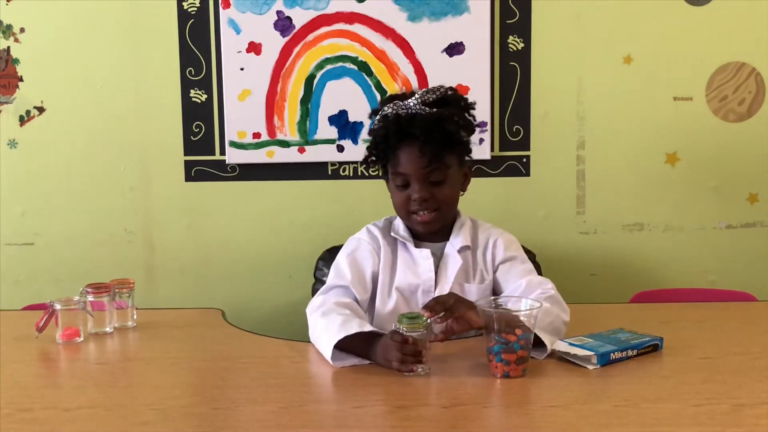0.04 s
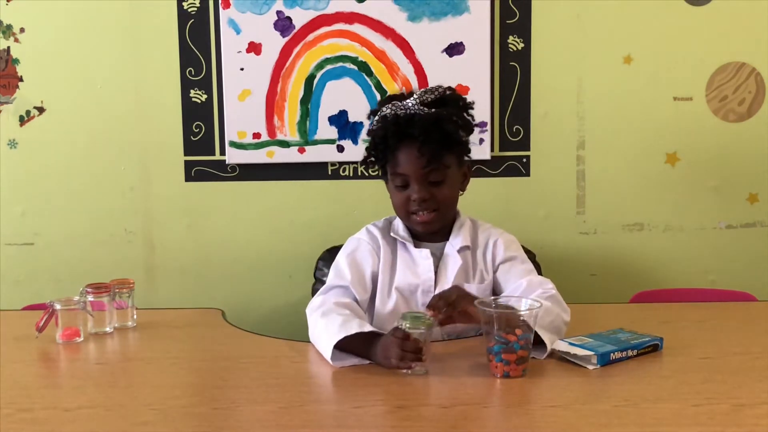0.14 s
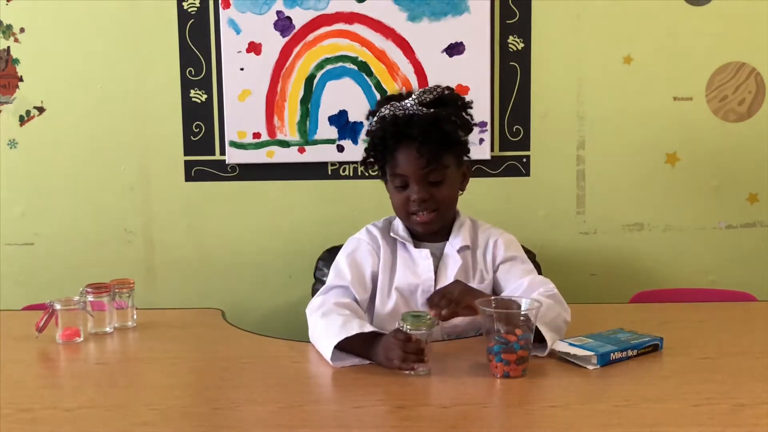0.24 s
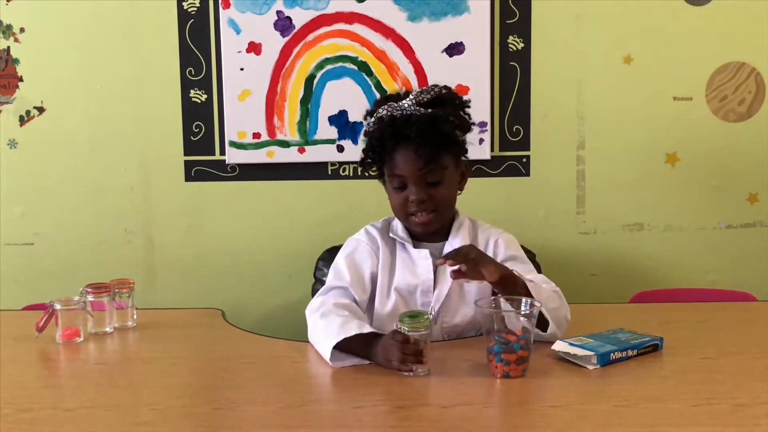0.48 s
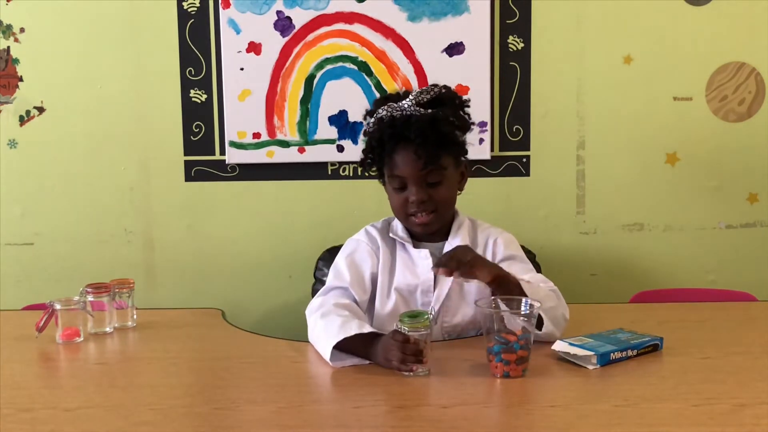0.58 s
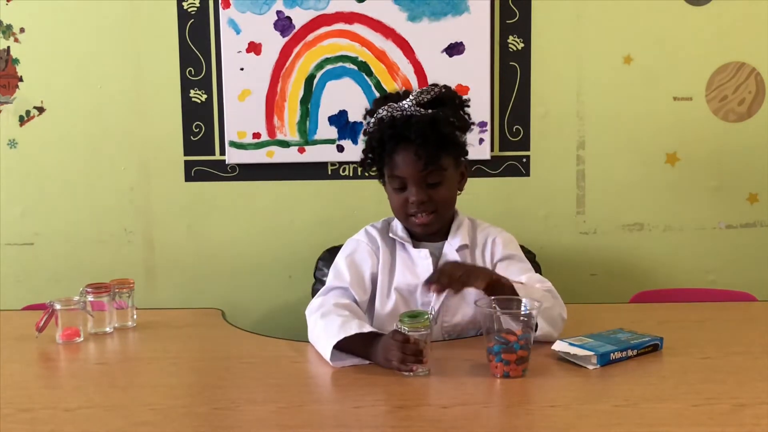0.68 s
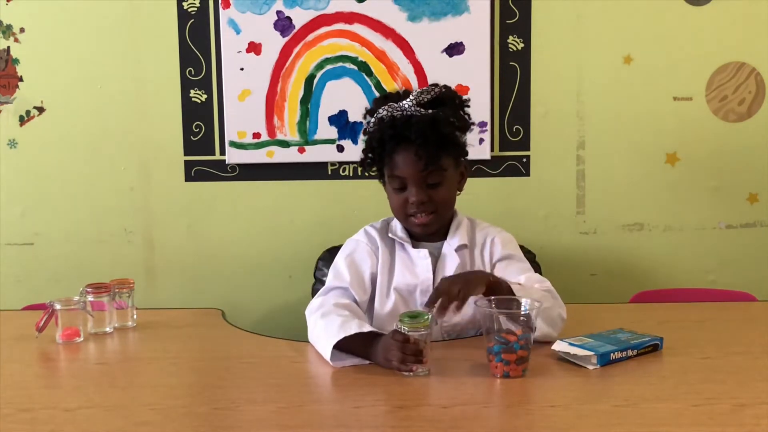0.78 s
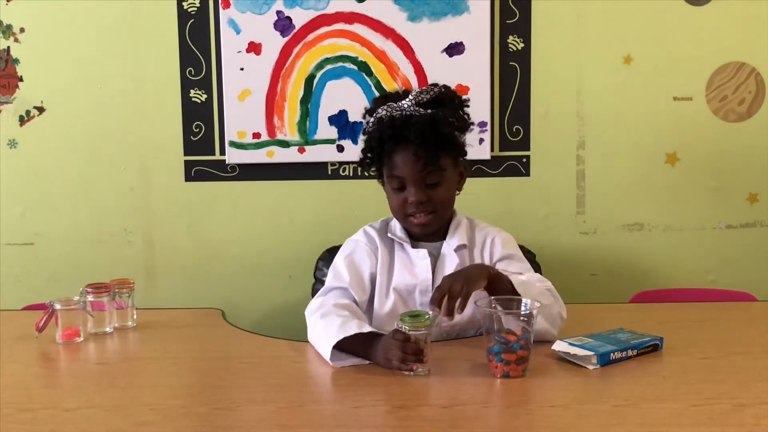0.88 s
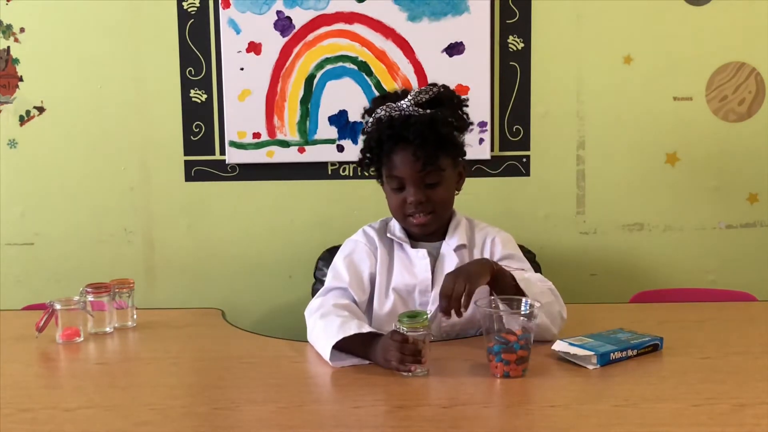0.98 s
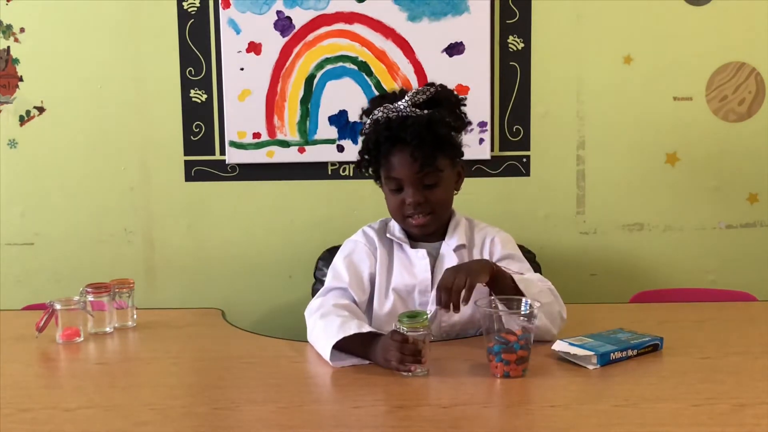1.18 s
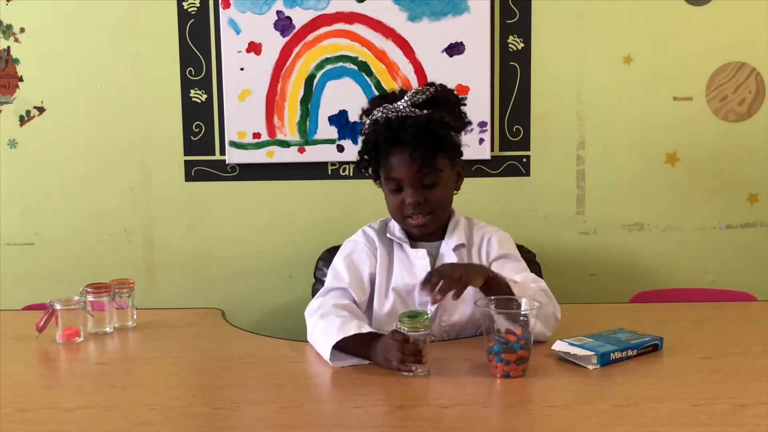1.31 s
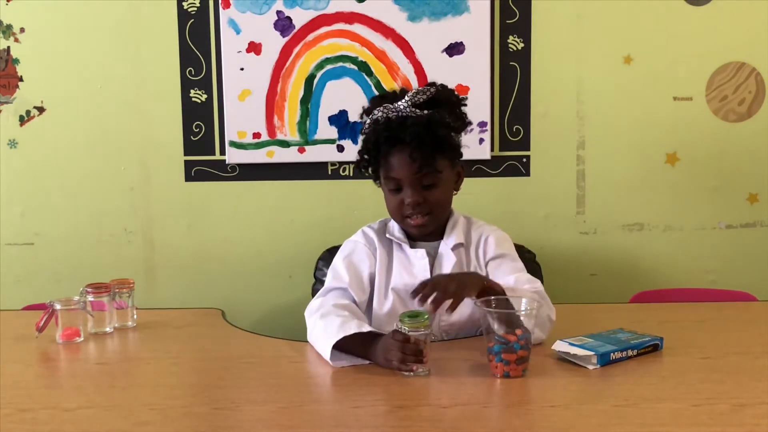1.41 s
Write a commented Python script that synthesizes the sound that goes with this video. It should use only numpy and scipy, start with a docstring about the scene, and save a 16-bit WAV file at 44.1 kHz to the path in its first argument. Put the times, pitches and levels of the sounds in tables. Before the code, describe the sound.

Close in a small bare room with low ventilation air, a loud overloaded table knock rattles candies in glass, a softer thump follows, then a candy taps the wall and lands with a sharp clink.

```python
"""Low, steady ventilation air with a faint hum, close by a wooden table in a small, bare room.
A hard knock shakes the tabletop and a glass jar of hard candies, and a softer knock follows.
A candy ticks against the glass, the jar knocks again and the candy lands with a bright double clink.
Struck bodies are decaying sines, contacts are short coloured noise, and dense noise echoes make the room.
The loudest knock overloads the microphone."""
import sys
import numpy as np
from scipy import signal
from scipy.fft import rfft, irfft
from scipy.io import wavfile

SR = 44100
rng = np.random.default_rng(int(sys.argv[2]) if len(sys.argv) > 2 else 0)


def inscribe(sig):
    """Save sig as 16-bit PCM at rate SR to the path in sys.argv[1].

    A 1-D sig is mono; a 2-D sig holds one channel per row.
    Samples are clipped to [-1, 1] before scaling.
    """
    pcm = np.round(np.clip(np.atleast_2d(sig).T, -1, 1) * 32767)
    wavfile.write(sys.argv[1], SR, pcm.astype(np.int16))


N = 63945
T = np.arange(N) / SR  # s
HZ = np.fft.rfftfreq(N, 1 / SR)

# Knocks on the table. Each row: start in seconds, level of the hollow knock in dB, contact cut-off in Hz,
# tabletop level in dB, lowest tabletop frequency in Hz, glass rattle level in dB.
TABLE_KNOCKS = [(.2050, -18, 4000, -23, 403, -11), (.2063, 0.5, 5900, 0, 105.3, -1),
                (.2135, -25, 2980, -8, 120.3, -12), (0.3579, -18.5, 6150, -32, 410, -29),
                (0.3606, -7.5, 1180, -15, 130, -37), (.3760, -17.5, 800, -21, 110, -40),
                (.9938, -23, 6000, -39, 402, -57), (0.9969, -8.5, 1500, -18.5, 263, -50)]
# Colour of the contact noise of taps and clinks. Each row: frequency in Hz, relative level in dB.
TICK_COLOUR = [(300, -2), (2000, -6.5), (3500, -7), (5500, 6), (7800, -5), (11500, -0.5), (15500, 2)]


def undb(db):
    """Decibels to gain."""
    return 10 ** (np.asarray(db) / 20)


def lookup(points, hz):
    """Read a table of (Hz, value) on a log-frequency axis."""
    f, v = np.array(points, float).T
    return np.interp(np.log(hz + 1), np.log(f), v)


def fade(t60):
    """Exponential decay of 60 dB in t60 seconds."""
    return np.exp(-np.log(1000) * T / t60)


def rise(seconds):
    """A soft attack with this time constant."""
    return 1 - np.exp(-T / seconds)


def noise(colour):
    """Noise of rms 1 with the given colour."""
    white = rng.standard_normal(N)
    x = irfft(rfft(white) * undb(lookup(colour, HZ)), N)
    return x / x.std()


def ring(modes):
    """Decaying sines of a struck body."""
    return sum(undb(db) * np.sin(2 * np.pi * hz * T) * fade(t60) for hz, db, t60 in modes)


def shimmer(modes, spread, count=12):
    """Glass loaded with candies: each mode splits into close partials that beat."""
    t, out = T[:N // 6], np.zeros(N)  # the partials stop after a sixth of the scene
    for hz, db, t60 in modes:
        detune, phase = rng.uniform(-1, 1, (2, count, 1))
        partial_hz = hz * (1 + spread * detune)
        partials = np.sin(2 * np.pi * partial_hz * t + np.pi * phase)
        cluster = partials.sum(0) * fade(t60)[:len(t)]
        out[:len(t)] += undb(db) * cluster / np.sqrt(count)
    return out


def at(x, start):
    """Delay a sound to its start time."""
    return np.concatenate([np.zeros(int(start * SR)), x])[:N]


def soften(x, hz):
    """A softer contact excites less treble."""
    return signal.sosfilt(signal.butter(2, hz, fs=SR, output="sos"), x)


def thin(x, hz):
    """Take away the bass below hz."""
    return signal.sosfilt(signal.butter(3, hz, "high", fs=SR, output="sos"), x)


def ventilation():
    """Low steady air noise with a faint hum."""
    # Colour of the air. Each row: frequency in Hz, relative level in dB.
    air_colour = [(15, -46), (25, -14.5), (49, -4.5), (183, -6.5), (253, -12.5), (289, -13), (509, -15),
                  (631, -22.5), (782, -19.5), (1340, -27), (1620, -29.5), (15500, -38.5)]
    # Steady hum tones. Each row: frequency in Hz, rms level in dB.
    hum_tones = [(52, -62), (102, -60), (179, -61), (297, -61.5)]
    hum = 0
    for hz, db in hum_tones:
        tone = np.sin(2 * np.pi * (hz * T + rng.random()))
        hum = hum + undb(db) * np.sqrt(2) * tone  # sqrt(2) gives the sine an rms of 1
    air_db = -49  # rms
    return undb(air_db) * noise(air_colour) + hum


def thud(low_hz):
    """The dense, short ring of the wooden top; a light blow does not reach its bass."""
    # Colour of the wood. Each row: frequency in Hz, relative level in dB.
    wood_colour = [(40, -33), (85, -11.5), (135, -1), (200, 3.5), (280, -11), (500, 2.5), (750, -1.5),
                   (1100, -1), (1700, -3), (2300, -9.5), (3500, -24), (8000, -46.5)]
    level_db, t60_s, rise_s = -4.5, 0.11, 0.00083
    wood = noise(wood_colour) * rise(rise_s) * fade(t60_s)
    return undb(level_db) * thin(wood, low_hz)


def knocks():
    """Each knock rings hollow, thuds in the wood and rattles the glass."""
    # Modes of the hollow knock. Each row: frequency in Hz, level in dB, 60 dB decay in seconds.
    hollow_modes = [(416.4, -12.5, 0.055), (752.4, -4.5, 0.034), (1225, -2.5, 0.043), (1622, -6, .028),
                    (2050, -9.5, 0.011), (2607, -13, .026), (2950, -27.5, .024)]
    # Modes of the rattling glass. Each row: frequency in Hz, level in dB, 60 dB decay in seconds.
    glass_modes = [(4100, -30, 0.15), (5390, -29, 0.15), (6110, -26.5, .2), (6690, -33, .12),
                   (8000, -38, .18), (11200, -35.5, .16), (11660, -32.5, 0.2)]
    # Colour of the contact crack. Each row: frequency in Hz, relative level in dB.
    crack_colour = [(300, -16.5), (1100, 0), (1800, 16.5), (2700, 6), (4000, 0.5), (6400, 0), (7400, -5),
                    (12000, -3.5), (16000, -13)]
    crack_db, crack_t60_s = -3, 0.018
    spread = 0.045  # scatter of the close partials, as a share of each mode's Hz
    body = thin(ring(hollow_modes), 270)  # small bodies radiate little bass
    out = 0
    for start, db, contact_hz, table_db, low_hz, glass_db in TABLE_KNOCKS:
        crack = undb(crack_db) * noise(crack_colour) * fade(crack_t60_s)
        rattle = shimmer(glass_modes, spread) + crack
        hollow = undb(db) * soften(body, contact_hz)
        wood = undb(table_db) * thud(low_hz)
        out = out + at(hollow + wood + undb(glass_db) * rattle, start)
    return out


def tabletop():
    """The long, faint ring of the table after each knock."""
    # Modes of the table. Each row: frequency in Hz, level in dB, 60 dB decay in seconds.
    wood_modes = [(129.6, -18, .35), (145.8, -20.5, 0.32), (419, -28, .55), (508, -13, 0.48),
                  (539, -24.5, 0.61), (712, -16.5, 0.48), (856, -18, 0.44), (884, -13.5, 0.36),
                  (995.5, -19, .5), (1208, -31.5, 0.39), (1552, -22.5, 0.47)]
    rise_cycles = 2.5  # each mode swells over a few cycles, so the bass comes late
    wood = sum(ring([mode]) * rise(rise_cycles / mode[0]) for mode in wood_modes)
    out = 0
    for start, _, _, table_db, low_hz, _ in TABLE_KNOCKS:
        out = out + at(undb(table_db) * thin(wood, low_hz), start)
    return out


def room(x):
    """Dense wall echoes as decaying noise in half-octave bands; the highest treble dies first."""
    # Decay of the room. Each row: frequency in Hz, 60 dB decay in seconds.
    decay_points = [(100, 0.29), (400, 0.4836), (1000, 0.39), (2500, 0.5756), (6000, 0.4445), (8500, 0.33),
                    (14000, 0.17)]
    # Strength of the room. Each row: frequency in Hz, echo energy over the direct sound in dB.
    strength_points = [(100, 1.5), (400, 3), (700, 2), (1200, -3), (2500, -8.5), (6000, -2), (14000, -3.5)]
    delay_s, build_s = 0.003, 0.0013
    spectrum, echo = rfft(rng.standard_normal(N)), 0
    onset = rise(build_s)
    for hz in 62.5 * 2 ** (np.arange(17) / 2):
        inside = np.abs(np.log2((HZ + 1) / hz)) < 1 / 4  # octaves either side
        band = irfft(spectrum * inside, N) * onset * fade(lookup(decay_points, hz))
        # a band with the energy of the same band of a single click
        unit_band = band * np.sqrt(inside.mean() / np.sum(band ** 2))
        echo = echo + unit_band * undb(lookup(strength_points, hz))
    return signal.fftconvolve(x, at(echo, delay_s))[:N]


def taps():
    """Light touches ring the glass wall and the hollow of the jar, and faintly the table."""
    # A candy touches the glass wall. Each row: start in seconds, ring level in dB,
    # level of the jar's hollow in dB, hollow pitch in Hz, tick level in dB.
    wall_touches = [(.8575, -49, -29, 820, -60), (.8660, -43, -25, 706, -45.5),
                    (.8720, -64, -26.5, 569, -50), (.8982, -45, -36, 778, -42),
                    (0.9536, -28, -22.5, 745, -29), (.9630, -34, -29, 654, -47)]
    # Modes of the glass wall. Each row: frequency in Hz, level in dB, 60 dB decay in seconds.
    glass_modes = [(2300, -14, 0.046), (4076, -7.5, 0.026), (5970, -4, 0.051), (6780, 0, 0.037),
                   (9530, -13, .025), (11040, -7.5, .03), (11600, -10.5, 0.035)]
    spread = 0.021  # scatter of the close partials, as a share of each mode's Hz
    tick_t60_s, hollow_t60_s, hollow_rise_s = 0.0093, 0.057, 0.0019
    wood_db, wood_low_hz = -14.5, 218  # the table under the jar, relative to the hollow
    out = 0
    for start, ring_db, hollow_db, hollow_hz, tick_db in wall_touches:
        wall = shimmer(glass_modes, spread)
        tick = noise(TICK_COLOUR) * fade(tick_t60_s)
        cavity = np.sin(2 * np.pi * hollow_hz * T) * rise(hollow_rise_s) * fade(hollow_t60_s)
        hollow = cavity + undb(wood_db) * thud(wood_low_hz)
        touch = undb(ring_db) * wall + undb(hollow_db) * hollow + undb(tick_db) * tick
        out = out + at(touch, start)
    return out


def clinks():
    """A sharp crack and a cluster of high glass modes for each landing."""
    # A candy lands and bounces. Each row: start in seconds, level in dB.
    landings = [(1.0246, -14), (1.0274, -8.5)]
    # Modes of the struck glass. Each row: frequency in Hz, level in dB, 60 dB decay in seconds.
    glass_modes = [(5000, -24, 0.12), (5450, -25, .18), (5820, -21, 0.16), (8700, -24, 0.033),
                   (11500, -39, 0.05), (12600, -37.5, .06), (14640, -29, .06)]
    crack_db, crack_t60_s = 3, 0.0057
    spread = 0.023  # scatter of the close partials, as a share of each mode's Hz
    out = 0
    for start, db in landings:
        crack = undb(crack_db) * noise(TICK_COLOUR) * fade(crack_t60_s)
        out = out + at(undb(db) * (crack + shimmer(glass_modes, spread)), start)
    return out


def scene():
    """All contacts, their echoes, the ringing table and the quiet room."""
    direct = knocks() + taps() + clinks()
    return (direct + room(direct) + tabletop() + ventilation())[None]


def record(dry):
    """The microphone clips at full scale and the top is cut."""
    top_hz = 15800
    clipped = np.clip(dry, -1, 1)
    return signal.sosfilt(signal.ellip(10, .1, 80, top_hz, fs=SR, output="sos"), clipped)


dry = scene()
out = record(dry)
inscribe(out)
```